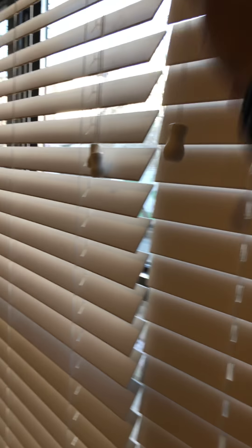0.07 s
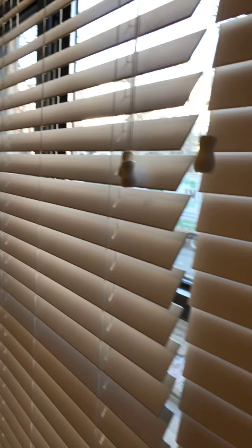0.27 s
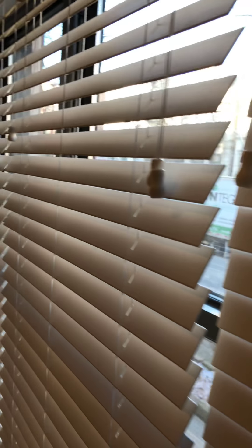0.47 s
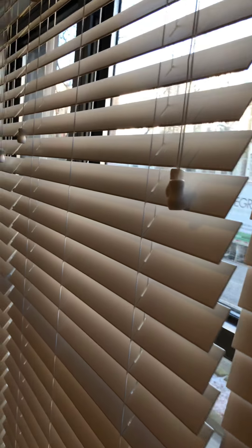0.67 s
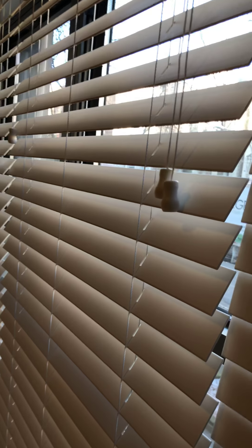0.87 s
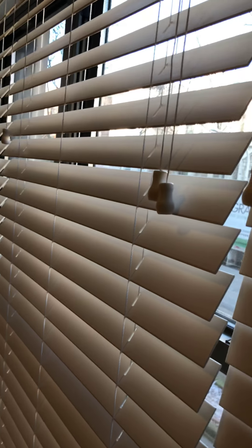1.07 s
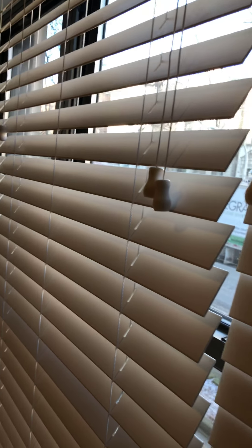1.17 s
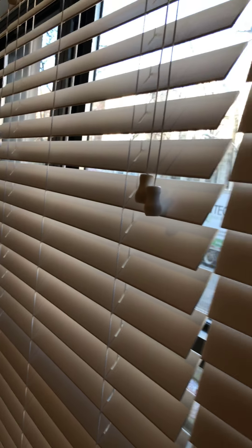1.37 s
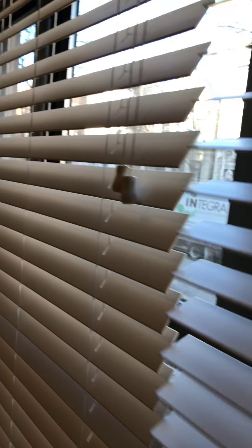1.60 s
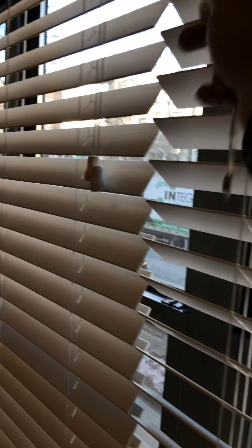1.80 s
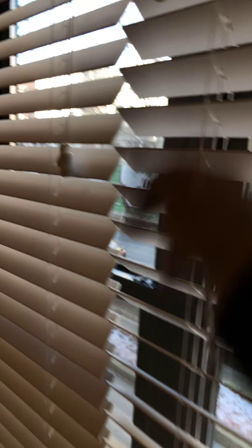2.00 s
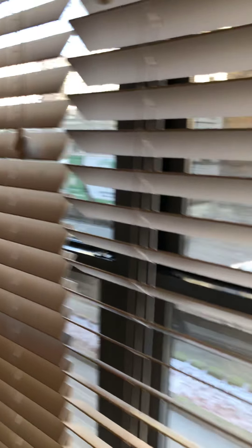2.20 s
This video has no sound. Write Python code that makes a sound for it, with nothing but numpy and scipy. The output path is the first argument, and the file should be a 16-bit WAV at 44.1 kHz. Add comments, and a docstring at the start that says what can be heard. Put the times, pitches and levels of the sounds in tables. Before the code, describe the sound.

Slatted blinds clacking, then jostling and knocking against their frame in an echoing room.

```python
"""Quick plastic clacks over a light hiss: a slatted window blind bounces against its neighbour.
After a lone knock and a few tiny squeaks of a cord, the blind is pushed aside: its slats jostle,
scrape and knock, it bumps its frame, and the cords tick and slide with a hiss.
The clacks and knocks echo in a bare room with a faint low hum."""
import sys
import numpy as np
from scipy import signal
from scipy.fft import rfft, irfft
from scipy.io import wavfile
from scipy.ndimage import uniform_filter1d

SR = 44100
rng = np.random.default_rng(int(sys.argv[2]) if len(sys.argv) > 2 else 0)


def inscribe(sig):
    """Save sig as 16-bit PCM at rate SR to the path in sys.argv[1].

    A 1-D sig is mono; a 2-D sig holds one channel per row.
    Samples are clipped to [-1, 1] before scaling.
    """
    pcm = np.round(np.clip(np.atleast_2d(sig).T, -1, 1) * 32767)
    wavfile.write(sys.argv[1], SR, pcm.astype(np.int16))


N = 99225
T = np.arange(N) / SR


def amp(db):
    """Turns decibels into a number to multiply by."""
    return 10 ** (np.asarray(db) / 20)


def unit(x):
    """Scales a signal to an average strength (rms) of 1."""
    return x / np.sqrt(np.mean(x ** 2) + 1e-20)


def read(points, hz):
    """Looks up a pitch in a table, blending between rows on a log scale."""
    pitch, value = np.transpose(points)
    return np.interp(np.log(hz + 1), np.log(pitch + 1), value)


def level(points):
    """Joins (time_s, level_db) points into a volume curve."""
    return amp(np.interp(T, *np.transpose(points)))


def add(mix, start_s, sound):
    """Mixes a sound in at its start time."""
    part = mix[round(start_s * SR):][:len(sound)]
    part += sound[:len(part)]


def colour(x, tone, tilt_db=0, modes=(), size=4096):
    """Filters a sound with a broad tone, ringing peaks (modes) and a tilt; tilting up is brighter."""
    hz = abs(np.fft.fftfreq(size, 1 / SR))
    peaks = sum(amp(db) ** 2 / (1 + ((hz - pitch) / width) ** 2) ** 2 for pitch, width, db in modes)
    power = amp(read(tone, hz)) ** 2 + peaks
    octaves = np.log2(np.clip(hz, 200, 7000) / 1800)
    log_gain = np.log(np.sqrt(power) * amp(tilt_db * octaves))
    spectrum = np.exp(np.conj(signal.hilbert(log_gain)))  # rings after a hit, never before
    taps = np.fft.ifft(spectrum).real[:size // 2]
    return signal.fftconvolve(x, taps / np.linalg.norm(taps))[:len(x)]


# tone of the steady room noise: pitch_hz, level_db
BACKGROUND_TONE = [(20, -40), (40, -3), (65, -1), (120, -4.5), (180, 2.5), (330, 0.5), (500, -7.5),
                   (750, -12), (1500, -33), (2200, -15), (3000, -24.5), (7500, -31.5), (8600, -34),
                   (15500, -32)]

def background(noise_db=-57, hum_hz=117.3, hum_db=-63.5):
    """Low, steady room noise with a wavering hum."""
    tone = amp(read(BACKGROUND_TONE, np.fft.rfftfreq(N, 1 / SR)))
    noise = irfft(rfft(rng.standard_normal(N)) * tone, N)
    waver = unit(uniform_filter1d(rng.standard_normal(N), size=9000))
    hum = (1 + 0.22 * waver) * np.sin(2 * np.pi * hum_hz * T)
    return amp(noise_db) * unit(noise) + amp(hum_db) * unit(hum)


# time the echo takes to fade by 60 dB: pitch_hz, fade_s
ECHO_FADE = [(80, 1.2), (250, 1.0), (600, 1.16), (1400, 1.5), (2200, 1.06), (4000, 1.54), (8000, 0.43),
             (15000, 0.8)]
# tone of the echo: pitch_hz, level_db
ECHO_TONE = [(60, -4), (250, 0.5), (500, -1.5), (900, -2), (1500, 0), (2100, 2.5), (3000, -1.5), (5000, -3),
             (8000, -0.5), (15000, 5)]
# notes at which the room and window recess ring: pitch_hz, level_db, fade_s
ROOM_NOTES = [(215, -24.5, .9), (263, -27.5, 0.54), (366.6, -24, 1.04), (509, -25, 0.85),
              (560.6, -23.5, 0.79), (819, -30, 1.9), (1016, -25, 1.3), (1170, -31, 0.43), (1388, -21, 0.99),
              (1547, -25.5, 0.45), (1566, -21, 0.47), (2070, -22, 1.1), (2367, -22, 0.4), (4810, -29, .35)]

def room_echo(x, tail_db=-0.5, early_db=-7, ring_db=-5, build_s=0.021, early_s=0.012):
    """Sound bounces off the window recess first, then lingers between the bare walls."""
    hz, t, noise = signal.stft(rng.standard_normal(N), SR, nperseg=512)
    fading_db = read(ECHO_TONE, hz)[:, None] - 60 * t / read(ECHO_FADE, hz)[:, None]
    tail = signal.istft(noise * amp(fading_db), SR, nperseg=512)[1][:N]
    build = 1 - np.exp(-T / build_s)
    reflections = rng.standard_normal(N) * (rng.random(N) < 2000 / SR)
    early = reflections * (T > .006) * np.exp(-T / early_s)
    ring = np.zeros(N)
    for pitch, db, fade_s in ROOM_NOTES:
        note = np.sin(2 * np.pi * (pitch * T + rng.random()))
        ring += amp(db) * unit(build * amp(-60 * T / fade_s) * note)
    response = amp(tail_db) * unit(tail * build) + amp(early_db) * unit(early) + amp(ring_db) * ring
    return signal.fftconvolve(x, response / np.sqrt(N))[:N]


# loudness of the sliding cords and slats: time_s, level_db
SLIDE_LOUDNESS = [(0, -57.5), (.10, -54.5), (.21, -54), (.30, -60.5), (.41, -55), (.47, -60), (.65, -58),
                  (.75, -68.5), (1.22, -68.5), (1.32, -59.5), (1.45, -57.5), (1.63, -53), (1.78, -54),
                  (1.89, -56.5), (2.0, -53.5), (2.25, -54)]
# tone of their hiss: pitch_hz, level_db
SLIDE_TONE = [(40, -28), (150, 4.5), (500, -2.5), (1100, 1), (2200, -1.5), (3000, -4.5), (4500, -4),
              (6500, -8), (7900, -7), (8500, -12.5), (12000, -14), (15500, -18)]

def slide(flutter_db=0.6, patch_db=1.0):
    """Cords and slats rub with a fine hiss that flutters and shifts in tone."""
    noise = signal.stft(rng.standard_normal(N), nperseg=256)[2]
    patches = uniform_filter1d(rng.standard_normal(noise.shape), size=6, axis=0)  # smooth over pitch
    patches = unit(uniform_filter1d(patches, size=8, axis=1))  # then over time
    flutter = unit(uniform_filter1d(rng.standard_normal(noise.shape[1]), size=4))
    hiss = signal.istft(noise * amp(patch_db * patches + flutter_db * flutter), nperseg=256)[1][:N]
    return unit(colour(hiss, SLIDE_TONE)) * level(SLIDE_LOUDNESS)


# squeaks of a cord: start_s, level_db, length_s
CORD_SQUEAKS = [(0.901, -46.5, 0.01), (.914, -48, 0.0083), (0.97, -55.5, 0.01)]

def squeaks(start_hz=1070, drop=0.21):
    """A cord slips in its guide with tiny falling chirps."""
    out = np.zeros(N)
    for start_s, db, length_s in CORD_SQUEAKS:
        progress = np.arange(0, length_s, 1 / SR) / length_s
        hz = start_hz * (1 - drop * progress)
        chirp = np.sin(2 * np.pi * np.cumsum(hz) / SR)
        add(out, start_s, amp(db) * np.sin(np.pi * progress) * chirp)
    return out


# ticks of cords on slats: start_s, level_db, decay_s
CORD_TICKS = [(.2972, -45.5, .001), (0.385, -45.5, .0008), (.4030, -45, 0.001), (.4175, -49, 0.00091),
              (1.018, -65, .003), (1.108, -60.5, .004), (1.121, -64, .003), (1.253, -62, .004),
              (1.439, -52.5, .003), (1.502, -53.5, .008), (1.587, -52, 0.003), (1.624, -52, 0.0096),
              (1.678, -50, .004)]
# tone of the ticks: pitch_hz, level_db
TICK_TONE = [(500, -18), (2500, -12), (4500, 5.5), (8000, 2), (12000, 3.5), (15500, -7)]

def ticks():
    """Cords catch on slats with thin, bright ticks."""
    out, t = np.zeros(N), np.arange(2048) / SR
    for start_s, db, decay_s in CORD_TICKS:
        add(out, start_s, amp(db) * np.exp(-t / decay_s) * rng.standard_normal(len(t)))
    return colour(out, TICK_TONE)


# loudness of the scraping slats: time_s, level_db
SCRAPE_LOUDNESS = [(1.32, -75), (1.35, -46.5), (1.41, -49), (1.46, -69), (1.52, -80), (1.60, -51),
                   (1.72, -63), (1.85, -92), (2.25, -85)]

def scrape(pitch_hz=790, width_hz=124):
    """Slats rub over one another and stir up one hollow note."""
    b, a = signal.iirpeak(pitch_hz, pitch_hz / width_hz, SR)
    rub = signal.lfilter(b, a, signal.lfilter(b, a, rng.standard_normal(N)))
    return unit(rub) * level(SCRAPE_LOUDNESS) * (T > SCRAPE_LOUDNESS[0][0])


# how hard the slats jostle: time_s, level_db
JOSTLE_LOUDNESS = [(1.30, -66), (1.33, -52.5), (1.37, -48), (1.40, -42.5), (1.45, -42.5), (1.49, -47),
                   (1.56, -41.5), (1.66, -44), (1.76, -45), (1.80, -49), (1.87, -50), (1.95, -67),
                   (2.25, -85)]
# tone of their taps: pitch_hz, level_db
JOSTLE_TONE = [(35, -36), (70, -15.5), (130, -1), (240, 2), (380, 0.5), (550, -7.5), (820, -2),
               (1200, -7.5), (1600, -9), (2300, -20), (4000, -20.5), (7500, -38), (9000, -40), (15500, -42)]

def jostle(taps_per_s=2500, spread_db=1.5):
    """Slats being pushed along make a crowd of dull taps of uneven size."""
    taps = (rng.random(N) < taps_per_s / SR) * rng.choice([-1, 1], N)
    sizes = amp(spread_db * np.minimum(rng.exponential(1, N), 3))
    rattle = unit(colour(taps * sizes, JOSTLE_TONE))
    return rattle * level(JOSTLE_LOUDNESS) * (T > JOSTLE_LOUDNESS[0][0])


# bumps against the frame: start_s, level_db, pitch_hz, rise_s
FRAME_BUMPS = [(1.230, -51, 149, 0.013), (1.325, -40, 211, 0.013), (1.393, -34.5, 101, 0.01),
               (1.439, -31.5, 226, 0.0081), (1.478, -39, 274, 0.015), (1.516, -29.5, 153, 0.0048),
               (1.545, -35, 94, 0.0042), (1.667, -40.5, 70.4, 0.011), (1.746, -35.5, 201, 0.0085),
               (1.937, -53, 63, 0.011), (2.03, -51, 56.5, 0.0076)]

def bumps():
    """The whole blind bumps its frame with soft, low thuds."""
    out, t = np.zeros(N), np.arange(SR // 5) / SR
    for start_s, db, hz, rise_s in FRAME_BUMPS:
        swell = (t / rise_s) ** 2 * np.exp(2 - 2 * t / rise_s)
        add(out, start_s, amp(db) * swell * np.sin(2 * np.pi * hz * t))
    return out


def burst(envelope):
    """A spray of tiny contacts that follows a volume curve."""
    x = rng.standard_normal(len(envelope))
    for _ in range(10):  # even out the pitches so that none sticks out
        spectrum = rfft(x * envelope)
        x = np.sign(irfft(spectrum / (abs(spectrum) + 1e-12), len(envelope)))
    return x * envelope


STRIKE_RISE_S = 0.002

def strikes(hits, snap, modes):
    """Plastic parts hit and ring briefly; returns the direct sound and what goes to the echo."""
    direct, to_echo, t = np.zeros(N), np.zeros(N), np.arange(4096) / SR
    for start_s, db, tilt_db, hold_s, decay_s, echo_db in hits:
        envelope = np.minimum(t / STRIKE_RISE_S, 1) * np.exp(-np.maximum(t - hold_s, 0) / decay_s)
        sound = amp(db) * colour(burst(envelope), snap, tilt_db, modes)
        add(direct, start_s, sound)
        add(to_echo, start_s, amp(echo_db) * sound)
    return np.array([direct, to_echo])


# knocks of single slats: start_s, level_db, tilt_db_per_octave, hold_s, decay_s, echo_db
SLAT_KNOCKS = [(.6700, -35, .5, 0.0028, 0.0013, 0), (1.3135, -45, -2.4, 0.0035, 0.0087, -2),
               (1.351, -53, -7, 0.0035, 0.0038, -4), (1.385, -50, 0, 0.0022, 0.0063, -13),
               (1.398, -40.5, -2, 0.0029, 0.0051, -10), (1.438, -39.5, -0.5, 0.00327, .004, -6.5),
               (1.5400, -30, -2, .004, .006, 0), (1.7010, -32, 4, .003, .003, -0.5),
               (1.717, -42, 2.5, 0.0026, 0.0065, -5), (1.841, -43.5, 0, 0.0034, 0.0037, 2)]
# tone of a slat's snap: pitch_hz, level_db
SLAT_TONE = [(50, -44), (170, -8), (700, -9), (2300, -9.5), (3300, -13), (7400, -21.5), (8600, -26.5),
             (15500, -32.5)]
# where a slat rings: pitch_hz, width_hz, level_db
SLAT_PEAKS = [(350, 100, -1.5), (550, 90, -2.5), (887, 73, -3), (1010, 130, -1.5), (1486, 135, 1),
              (1700, 114, -2), (1962, 110, -1), (3930, 183, -11.5), (4530, 140, -17), (5400, 170, -18)]

def knocks():
    """Single slats knock, each with a snap and a short ring."""
    return strikes(SLAT_KNOCKS, SLAT_TONE, SLAT_PEAKS)


# bounces of the blind's edge: start_s, level_db, tilt_db_per_octave, hold_s, decay_s, echo_db
EDGE_CLACKS = [(0.2055, -26.5, -0.5, .003, 0.002, -1.5), (.2436, -26.5, .5, .0042, 0.0027, 0),
               (.2850, -28.5, 0, 0.0033, 0.0035, -0.5), (.3440, -38, -1, 0.0065, 0.0069, -3)]
# tone of the edge's snap: pitch_hz, level_db
EDGE_TONE = [(50, -36), (170, -8), (450, -13), (1000, -5), (2300, -7.5), (4000, -13), (7000, -19.5),
             (8600, -21.5), (15500, -28)]
# where the edge rings: pitch_hz, width_hz, level_db
EDGE_PEAKS = [(327, 61, 0), (653, 206, 1), (1260, 140, -0.5), (1560, 140, 0), (2060, 280, -0.5),
              (2430, 110, -1.5), (3050, 140, -6.5), (3580, 170, -11), (4770, 180, -7.5), (5350, 200, -14),
              (6050, 160, -13), (7960, 240, -16.5)]

def clacks():
    """The blind's edge hits its neighbour in quick bounces."""
    return strikes(EDGE_CLACKS, EDGE_TONE, EDGE_PEAKS)


# hollow notes left by each clack: pitch_hz, relative_level_db, fade_s
EDGE_NOTES = [(348, -11, 0.053), (593, -12, 0.037), (1603, -8, 0.042), (2490, -9.5, .03),
              (4720, -17, 0.055)]

def edge_ring():
    """Each bounce leaves the edge ringing for a few hundredths of a second."""
    out, t = np.zeros(N), np.arange(4096) / SR
    swell = np.minimum(t / STRIKE_RISE_S, 1) ** 2
    for start_s, clack_db, *_ in EDGE_CLACKS:
        for hz, note_db, fade_s in EDGE_NOTES:
            note = np.sin(2 * np.pi * (hz * t + rng.random()))
            add(out, start_s, swell * amp(clack_db + note_db - 60 * t / fade_s) * note)
    return out


def scene():
    """Mixes the blinds, their echo and the background into one channel."""
    hits, hits_to_echo = clacks() + knocks()
    rattle = jostle() + scrape()
    small_sounds = bumps() + squeaks() + ticks() + edge_ring()
    hiss = slide()
    echo = room_echo(hits_to_echo + amp(-2.5) * rattle + amp(-6.5) * small_sounds)
    return (hits + rattle + small_sounds + hiss + echo + background())[None]


def record(dry, low_hz=44.6, high_hz=15850):
    """The microphone loses the deepest bass and the highest treble."""
    bass_cut = signal.butter(2, low_hz, "high", fs=SR, output="sos")
    treble_cut = signal.firwin(511, high_hz, window=("kaiser", 9), fs=SR)
    return signal.oaconvolve(signal.sosfilt(bass_cut, dry), treble_cut[None], "same")


dry = scene()
out = record(dry)
inscribe(out)
```